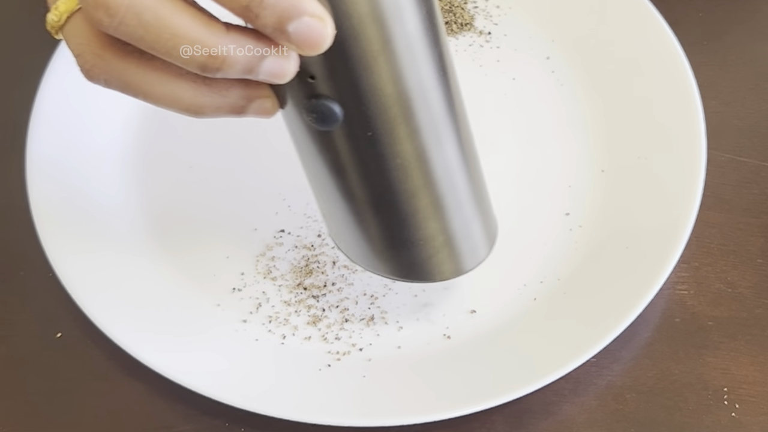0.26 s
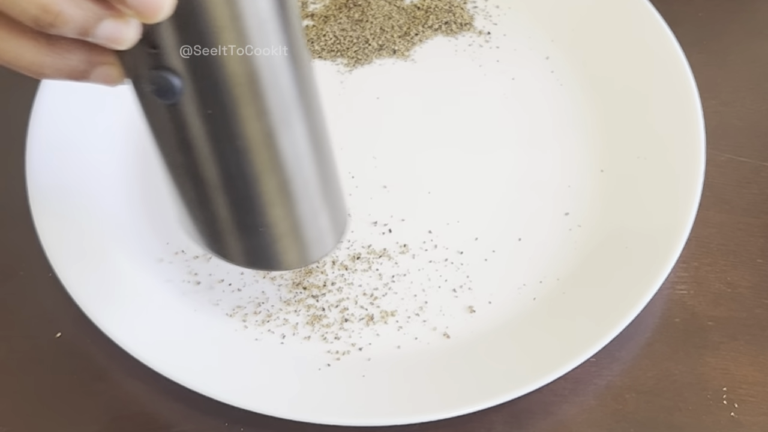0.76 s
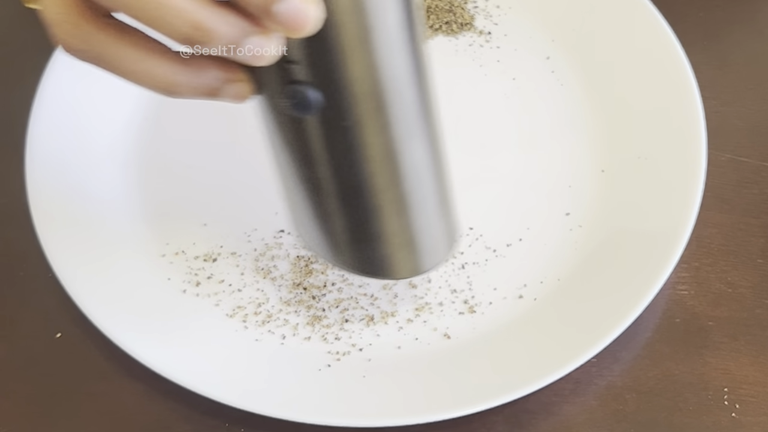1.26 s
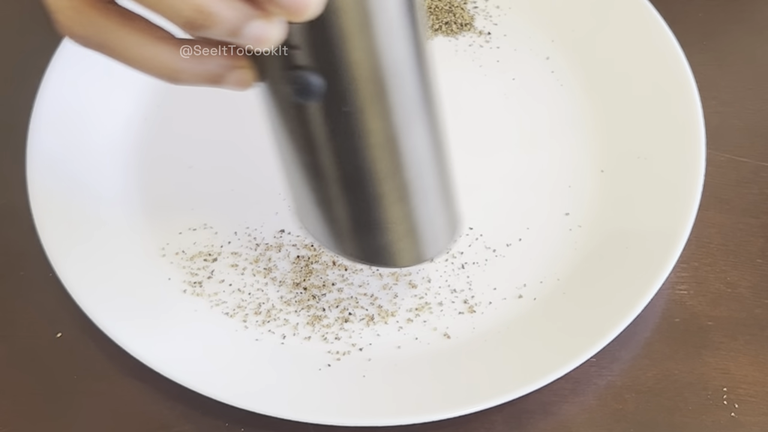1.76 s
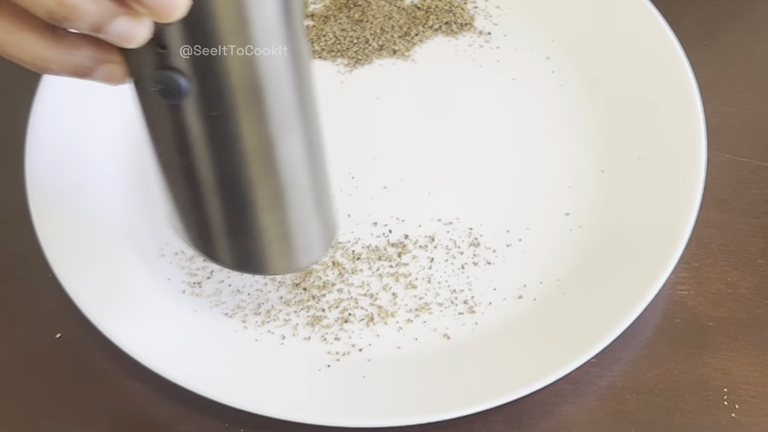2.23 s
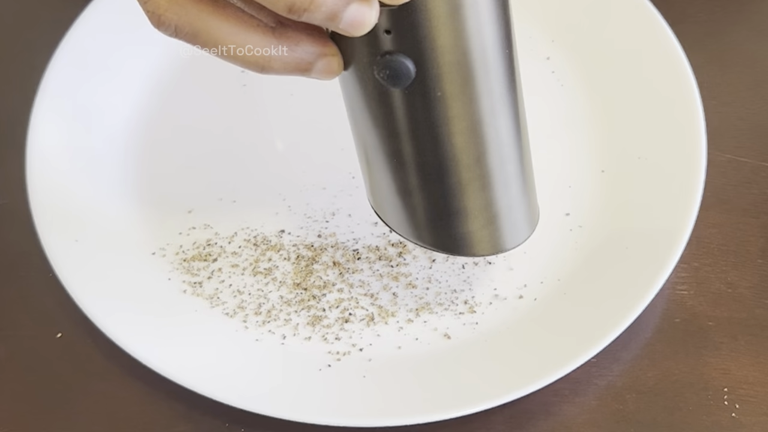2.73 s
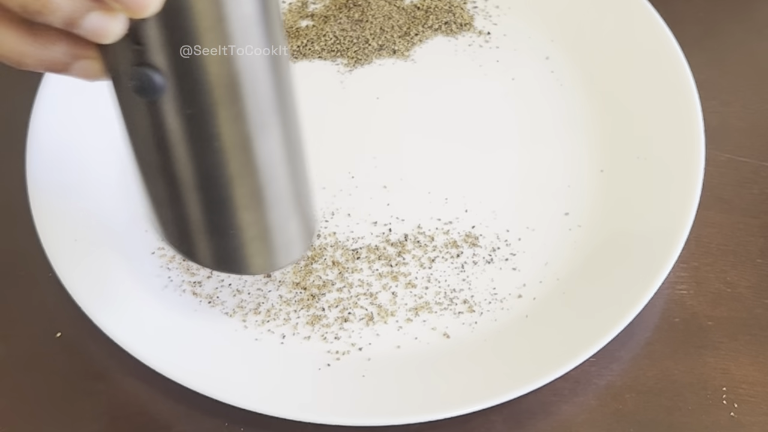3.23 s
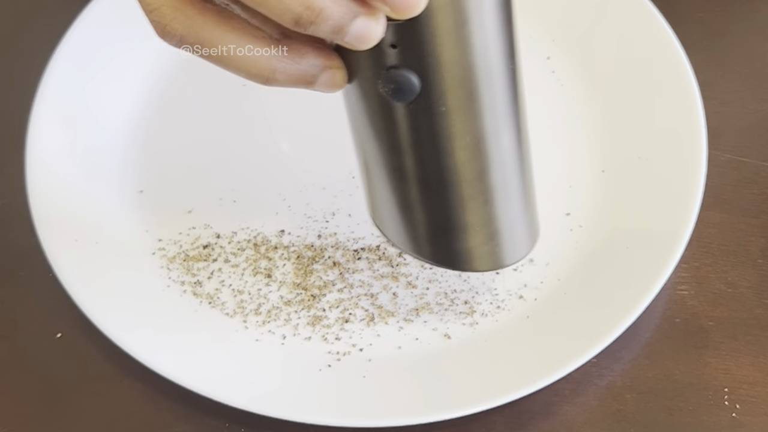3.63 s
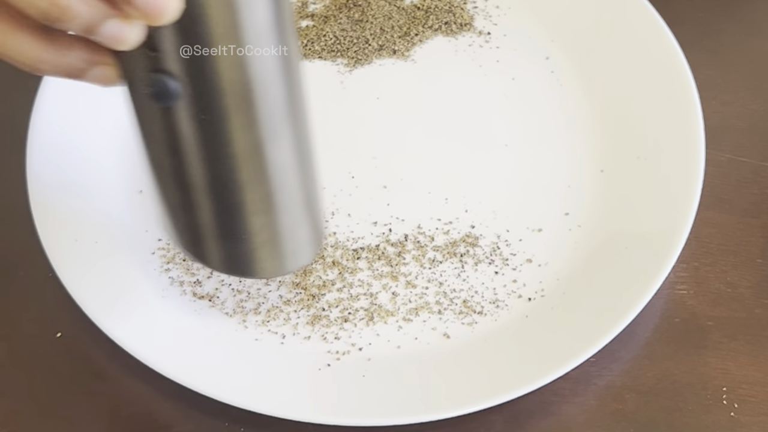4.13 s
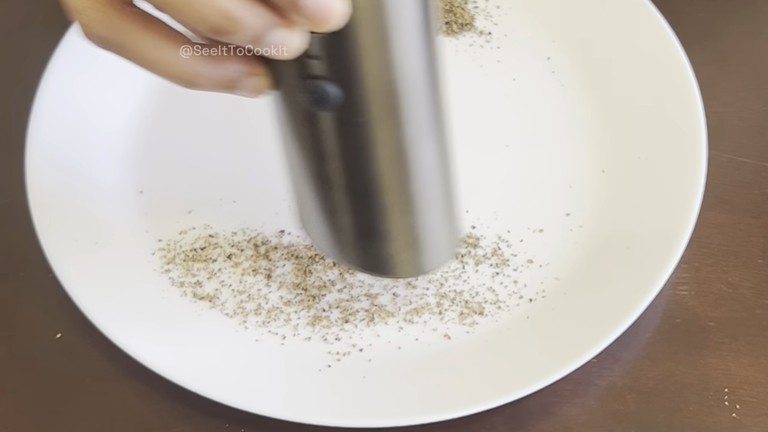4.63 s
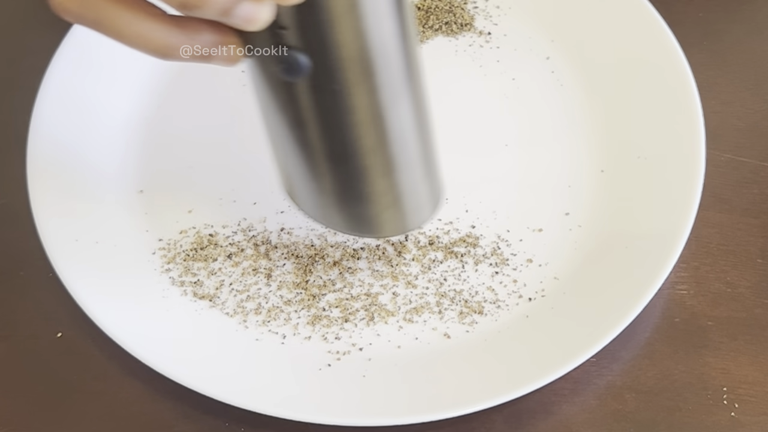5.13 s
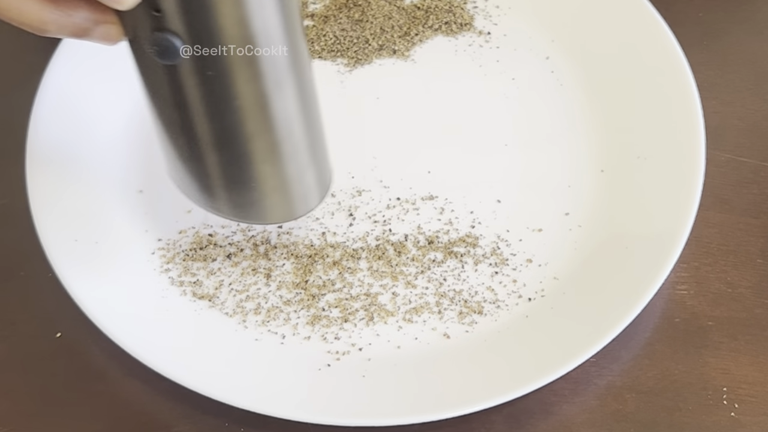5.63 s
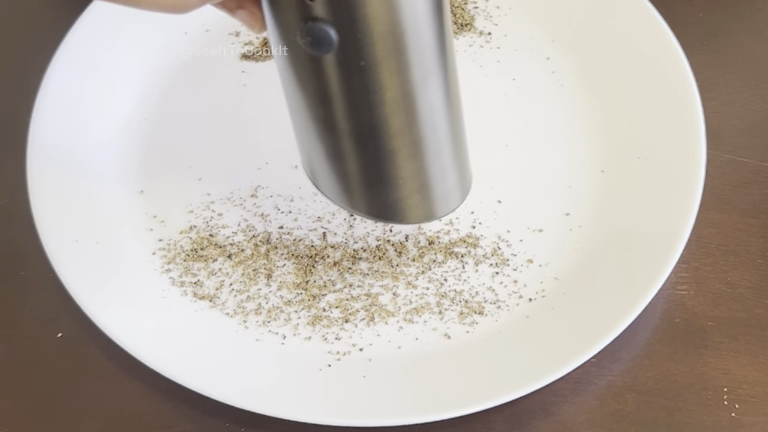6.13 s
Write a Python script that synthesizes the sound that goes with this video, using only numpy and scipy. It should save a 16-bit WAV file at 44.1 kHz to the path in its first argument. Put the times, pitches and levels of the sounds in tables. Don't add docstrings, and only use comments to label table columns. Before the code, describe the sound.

Already running at the start and never stopping, a small motor sings with a harsh, buzzing whine and bright mechanical hiss. Pitch droops shortly and springs back as peppercorns catch in the burr. Small dry snaps poke through now and then. The stereo pickup is close, with short plate and table reflections and very quiet room tone beneath.

```python
import sys
import numpy as np
from scipy import signal
from scipy.fft import rfft, irfft, next_fast_len
from scipy.io import wavfile

SR = 44100
rng = np.random.default_rng(int(sys.argv[2]) if len(sys.argv) > 2 else 0)


def volts(x):
    e = np.asarray(x, float) / 20
    return 10 ** e


def to_wav(s):
    ch = np.atleast_2d(s).T
    pcm = np.round(np.clip(ch, -1, 1) * 32767)
    wavfile.write(sys.argv[1], SR, pcm.astype(np.int16))


N = 281799
T = np.arange(N) / SR
SLOW = T[::128]

# (frequency [Hz], level [dB per Hz])
KITCHEN_AIR = [(53, -30), (90, -5), (129, -4.5), (172, -3.5), (247, -3), (346, -16), (432, -6), (640, -16),
               (830, -44), (1410, -120)]
# (time [s], rumble [dB], length [s])
JOLTS = [(0.184, -55, 0.1), (0.327, -58, .1), (0.982, -57, .12), (1.2, -63, .06), (1.766, -56, 0.15),
         (2.0, -64, 0.067), (2.27, -44, 0.086), (2.35, -55, 0.058), (3.37, -66, 0.069), (3.7, -59, .1),
         (4.503, -64, 0.11), (4.772, -52, 0.084), (4.92, -56, 0.056), (5.25, -56, .14), (5.38, -56, 0.066),
         (6.0, -57, 0.18)]
# (time [s], peak [dB])
CRACKS = [
    (0.107, -15),
    (0.7584, -17),
    (1.0714, -13),
    (1.5737, -22),
    (2.5501, -13),
    (2.873, -9),
    (3.532, -4.5),
    (5.5892, -21),
    (6.0391, -23),
]
# (frequency [Hz], level [dB per Hz])
TUBE = [(300, -46.5), (600, -39.5), (1150, -28.5), (1450, -16.5), (2250, -20.5), (3400, -20), (4400, -21),
        (5500, -19), (7000, -18.5),
        (9300, -19), (10200, -23), (11500, -22), (13500, -27.5), (16000, -28.5)]
# (frequency [Hz], width [Hz], lift [dB])
RINGS = [(746, 74, 7.5), (962, 150, 7), (1804, 475, 9.5), (2125, 280, 4), (2560, 100, 5.5),
         (2910, 580, 10.5), (3980, 440, 5.5), (4790, 110, 2.5), (7130, 250, -2), (7790, 510, -7.5),
         (8080, 160, 8.5)]
# (rate [cycles per shaft turn], depth [dB], offset [cycles])
THROB = [(1, 4.5, 0.046), (1.8, 3, 0.12), (1.6, 2.1, 0.087), (5.7, 0, 0.3), (.0735, 0.6, 0.15),
         (.84, 1.6, .0)]
# (from [Hz], to [Hz], delay [turns], throb share [1], tick scatter [dB])
CHATTER = [
    (4800, 7000, 0.0, .7, .8),
    (7000, 10000, .2, 1.1, 2.2),
    (10000, 20000, .4, .6, 1.0),
]
# (time [s], shaft rate [Hz])
FREE_SPEED = [(0.0, 249.3), (0.9, 248.7), (1.5, 256.8), (1.8, 252.7), (2.2, 257.6), (2.5, 251.6),
              (3.0, 256.3), (3.3, 248.5), (3.7, 254.6), (3.95, 260.8), (4.1, 250.6), (4.5, 258.3),
              (4.8, 260.1), (5.25, 254.2), (5.8, 248.3), (6.05, 253.5), (6.39, 248.2)]
# (time [s], length [s], sag of the shaft rate [Hz])
JAMS = [(-0.001, 0.03, 6.3), (0.123, 0.146, 7.2), (0.414, 0.065, 6.9), (0.519, 0.245, 19.5),
        (0.98, 0.139, 11.6), (1.201, 0.151, 15.2), (1.511, 0.062, 6.7), (1.601, 0.09, 10.5),
        (1.973, 0.085, 3.1), (2.507, 0.058, 6.9), (2.654, 0.246, 10.0), (3.095, 0.03, 5.9),
        (3.327, 0.243, 24.7), (3.504, 0.068, 10.4), (4.154, 0.213, 7.4), (4.257, 0.063, 5.9),
        (4.524, 0.125, 1.8), (5.278, 0.111, 11.8), (5.43, 0.267, 10.7), (5.4, 0.21, 5.6),
        (6.069, 0.03, 6.5), (6.296, 0.03, 8.8)]
# (order [1], rms [dB], best shaft rate [Hz], width [Hz], flicker [dB])
SINGERS = [(1, -65, 266.3, 14.7, 2.5), (1, -69.5, 230, 9.7, 2.8), (3, -45, 252.6, 17, 1.0),
           (3, -57.5, 222, 10, 3), (5, -52, 265, 17.4, 5), (6, -40.5, 256, 9.2, 3),
           (6, -43.5, 220, 12, 2.2), (7, -35, 250, 56, 1.4), (8, -33, 233.8, 29.8, 2),
           (9, -40.5, 235, 13.3, 2.5), (10, -42.5, 255, 13.4, 2.2), (10, -44, 210.5, 8.7, 9.5),
           (12, -44, 235.5, 36, 2.2), (15, -44.5, 261.9, 22, 0.5), (17, -42.5, 231, 14, 1),
           (18, -43, 210, 11, -6), (20, -41.5, 214, 66, 2.5)]
# (order [1], rms [dB])
WEAK_ORDERS = [(4,-56.5), (11,-59), (13,-88), (14,-57.5), (16,-54), (19,-72), (21,-49), (22,-67.5),
               (23,-48.5), (24,-50), (25,-56), (26,-69), (27,-72), (28,-47), (29,-56), (30,-47.5),
               (31,-59.5), (32,-60), (33,-56), (40,-81)]
# (time [s], order [1], lift [dB], length [s])
TILTS = [(.69, 3, -10, .18), (.66, 7, 2, .3), (.66, 8, 1.5, .3), (.66, 9, -3, .3), (3.3, 20, -5, .1),
         (3.9, 8, -3, .2), (4.28, 8, 2, .18), (5.35, 20, 4, .15), (.7, 20, -6, .12), (.68, 17, 3, .2),
         (.68, 10, -5, .15), (1.85, 12, 5, .25), (1.85, 7, -4, .25), (1.9, 6, 3, .4), (1.87, 10, 4, .2),
         (2.42, 12, 4, .15), (3.03, 20, 6, .15), (3.47, 20, 4, .17), (3.45, 3, 4, .2), (3.94, 15, 3, .14),
         (4.82, 15, 4, .25), (4.95, 12, -5, .5), (5.6, 20, 3, .25), (5.65, 12, -3, .2), (6.1, 12, 3, .3)]
# (frequency [Hz], right leads by [radians], likeness 0-1 [1], left minus right [dB])
PORTS = [(60, 0, .99, 0), (250, 0, .7, .2), (500, .2, .45, 0), (750, .5, .9, -.7), (1000, 0, .9, -1.5),
         (1300, 0, .97, -.5), (1600, 0, .985, 0), (2000, 0, .995, 0), (2400, .03, .94, .8),
         (3000, .06, .92, 1.2), (3450, .25, .65, .5), (3900, .3, .86, 2.5), (4600, 1.5, .45, 2.5),
         (5000, 2.5, .25, .5), (5250, 4.4, .1, -.5), (5400, 6.0, .55, -1.0), (5900, 6.15, .93, 0),
         (6400, 6.283, .998, 0), (6900, 6.3, .99, 0), (7400, 6.45, .96, 0), (7750, 6.9, .85, 0),
         (12200, 8.8, .83, 0), (12700, 9.35, .96, 0), (13100, 9.425, 1, 0)]


def unit(x):
    return x / np.sqrt(np.mean(x ** 2))


def walk(rate):
    points = rng.standard_normal(int(N / SR * rate) + 2)
    return 1.159 * np.interp(T * rate, np.arange(len(points)), points)


def swell(s, length):
    return np.exp(-(2 * (SLOW - s) / length) ** 2)


def colour(x, gain):
    size = next_fast_len(N)
    hz = np.arange(size // 2 + 1) * SR / size + 1
    return irfft(rfft(x, size) * gain(hz), size)[:N]


def shape(table, hz):
    f, db = np.transpose(table)
    return volts(np.interp(np.log(hz), np.log(f), db, left=-99, right=-99))


def hand():
    still_db = -63.5
    swells = sum(volts(db) * swell(s, length) for s, db, length in JOLTS)
    return np.interp(T, SLOW, 20 * np.log10(volts(still_db) + swells))


def kitchen(rumble_db):
    hum_hz, hum_db, air_db = 121, -68, -66.5
    middle, side = [unit(colour(rng.standard_normal(N), lambda hz: shape(KITCHEN_AIR, hz)))
                    for _ in range(2)]
    hum = np.sqrt(2) * volts(hum_db + 1.7 * walk(12)) * np.sin(2 * np.pi * hum_hz * T + .5 * walk(9.9))

    def tremor_gain(hz):
        return 1 / np.sqrt(1 + ((hz - 63) / 6) ** 2) + 0.012 / (1 + (hz / 350) ** 4)

    tremor = unit(colour(rng.standard_normal(N), tremor_gain))
    common = hum + tremor * volts(rumble_db + 2.0 * walk(6.1))
    return common + volts(air_db) * (middle + 0.42 * side * np.array([[1], [-1]]))


def cracks():
    out, tail = np.zeros(N), np.arange(400) / SR
    for s, db in CRACKS:
        i = int(s * SR)
        out[i:i + 400] += volts(db) * rng.standard_normal(400) * np.exp(-tail / 0.00037)
    return colour(out, lambda hz: 1.2 / np.sqrt((1 + (1500 / hz) ** 4) * (1 + (hz / 4000) ** 4)))


def tube(hz):
    rings_db = sum(db / (1 + (2 * (hz - f) / width) ** 2) for f, width, db in RINGS)
    return shape(TUBE, hz) * volts(rings_db)


def rattle(turns, sag_hz):
    tube_db = -34 - 0.04 * sag_hz
    treble_db = 1.13 + 0.0774 * sag_hz

    def throb_db(late):
        return sum(db * np.cos(2 * np.pi * (k * (turns - late) - offset)) for k, db, offset in THROB)

    def turn_db():
        return rng.standard_normal(N // 100)[turns.astype(int)]

    hiss = rng.standard_normal(N) * volts(.5 * throb_db(0) + .7 * turn_db() + .4 * walk(15))
    low = colour(hiss, lambda hz: tube(hz) / (1 + (hz / 4800) ** 4))
    high = 0
    for lo_hz, hi_hz, late, share, scatter_db in CHATTER:
        def band(hz):
            return tube(hz) / np.sqrt((1 + (lo_hz / hz) ** 8) * (1 + (hz / hi_hz) ** 8))

        ticks = unit(rng.standard_normal(N) * volts(scatter_db * rng.exponential(size=N)))
        ticks = ticks * volts(share * (throb_db(late) + 1.42 * turn_db()) + walk(30))
        high = high + colour(ticks, band)
    return 1.29 * unit(low) * volts(tube_db - 1) + 1.1 * unit(high) * volts(tube_db + treble_db)


def sag():
    grip_s, slip_s = .04, .03
    total_hz = 0
    for s, length, hz in JAMS:
        grip = 1 - np.exp(-np.clip(SLOW - s, 0, length) / grip_s)
        release = np.exp(-np.clip(SLOW - s - length, 0, None) / slip_s)
        total_hz = total_hz + hz * grip * release
    return np.interp(T, SLOW, total_hz)


def tilt_db(order):
    return sum(db * swell(s, length) for s, k, db, length in TILTS if k == order)


def whine(shaft_hz, turns):
    skirt = 1.5
    slow_hz = np.interp(SLOW, T, shaft_hz)
    rows = []
    for k, db, best_hz, width, flicker_db in SINGERS:
        fall_db = skirt * 10 * np.log10(1 + (2 * (slow_hz - best_hz) / width) ** 2)
        rows.append((k, db + tilt_db(k) - fall_db, flicker_db))
    for k, db in WEAK_ORDERS:
        lift_db = 20 * np.log10(unit(tube(k * slow_hz)))
        rows.append((k, db + lift_db, 2.5))
    out = 0
    for k, db, flicker_db in rows:
        start = min(k / 22, 1) ** 3 * rng.random()
        angle = 2 * np.pi * (k * turns + start) + .015 * k * walk(40)
        level = volts(db + flicker_db * np.interp(SLOW, T, walk(25)))
        out = out + np.sqrt(2) * np.interp(T, SLOW, level) * np.sin(angle)
    return out


def ports(tones, noise):
    f, lead, like, pan_db = np.transpose(PORTS)

    def share(hz):
        return np.interp(hz, f, like)

    near = tones + colour(noise, lambda hz: np.sqrt(share(hz)))
    far = colour(noise + 0.81 * tones, lambda hz: np.sqrt(1 - share(hz)))
    out = []
    for side in (-.5, .5):
        def port_gain(hz):
            return volts(-side * np.interp(hz, f, pan_db)) * np.exp(1j * side * np.interp(hz, f, lead))

        echo = rng.standard_normal((2, 2000)) * np.exp(-np.arange(2000) / SR / .014)
        echo = echo / np.sqrt(np.mean(np.sum(echo ** 2, axis=1)))
        wet = signal.fftconvolve(far[None], echo, axes=1)[:, :N]
        place = 3.0 * walk(5)
        both = near + wet[0] * np.cos(place) + wet[1] * np.sin(place)
        out.append(colour(both, port_gain))
    return np.array(out)


def scene():
    sag_hz = sag()
    free_s, free_hz = np.transpose(FREE_SPEED)
    shaft_hz = np.interp(T, free_s, free_hz) - sag_hz
    turns = np.cumsum(shaft_hz * (1 + .0028 * walk(30))) / SR
    noise = rattle(turns, sag_hz) + cracks()
    return ports(whine(shaft_hz, turns), noise) + kitchen(hand())


def low_pass(x):
    return signal.sosfilt(signal.butter(12, 15760, fs=SR, output="sos"), x)


def record(dry):
    return low_pass(dry)


dry = scene()
out = record(dry)
to_wav(out)
```